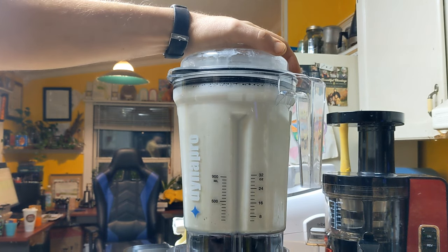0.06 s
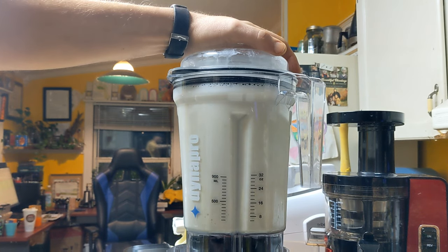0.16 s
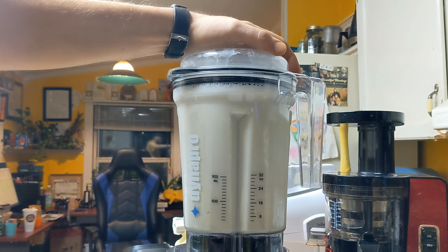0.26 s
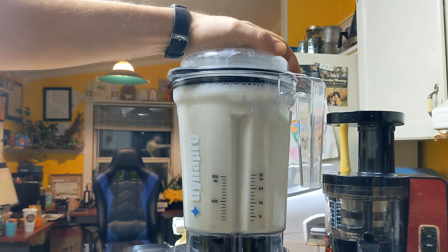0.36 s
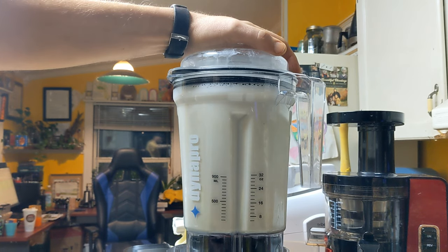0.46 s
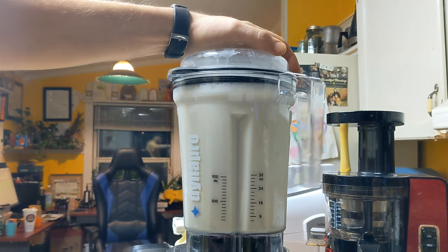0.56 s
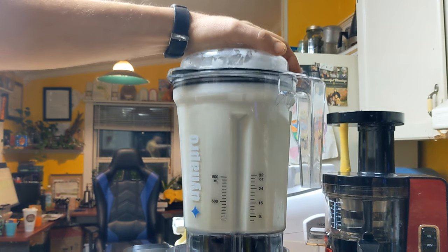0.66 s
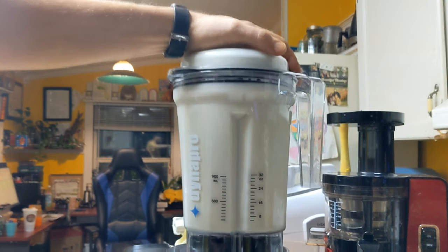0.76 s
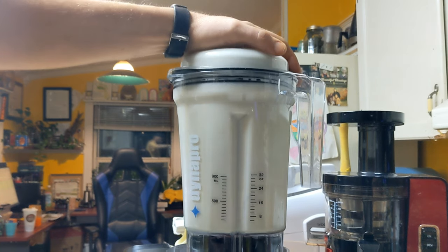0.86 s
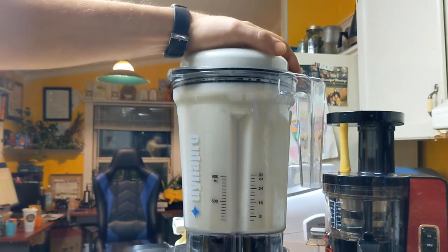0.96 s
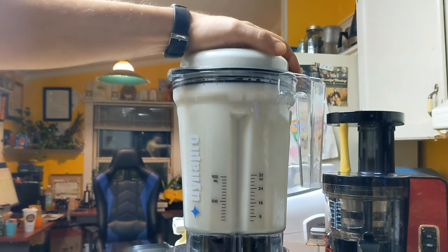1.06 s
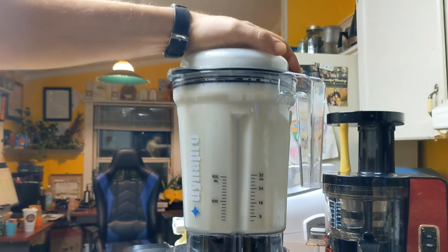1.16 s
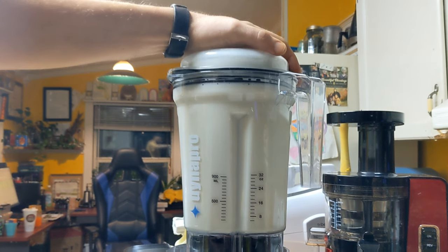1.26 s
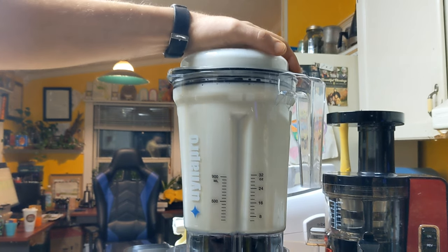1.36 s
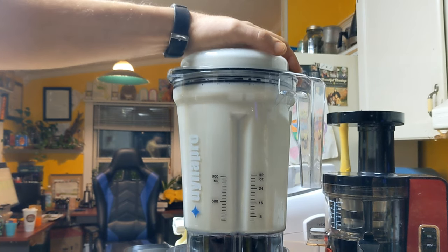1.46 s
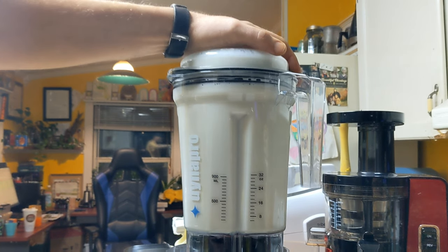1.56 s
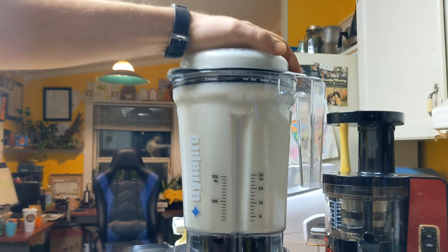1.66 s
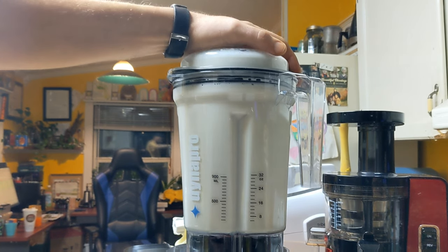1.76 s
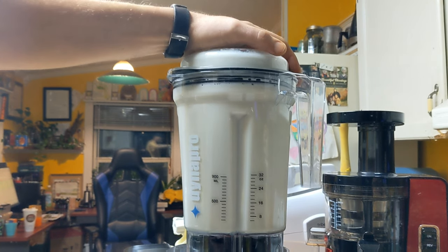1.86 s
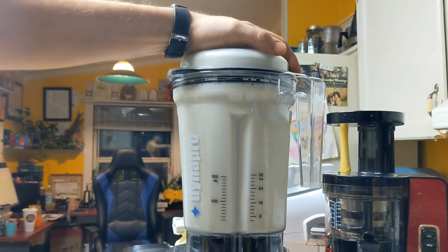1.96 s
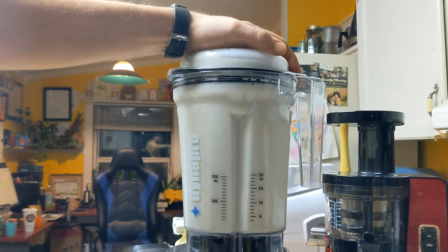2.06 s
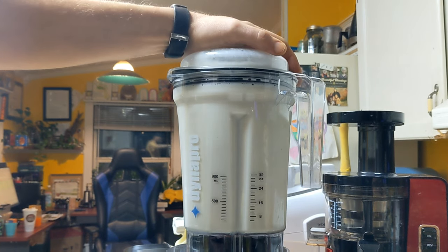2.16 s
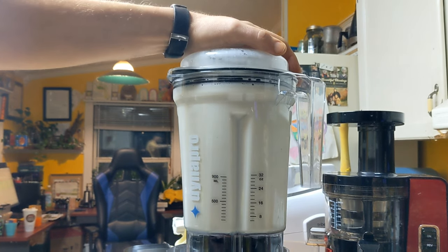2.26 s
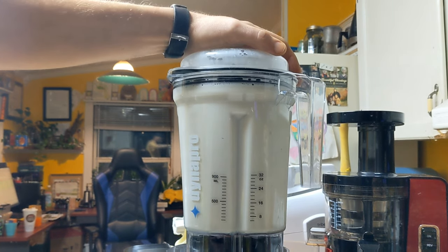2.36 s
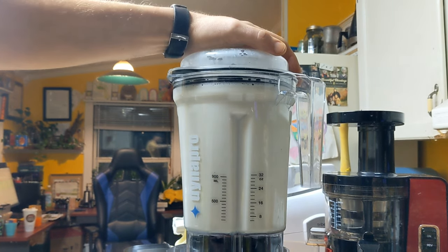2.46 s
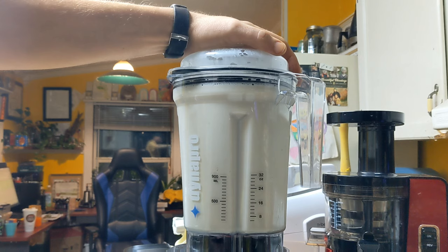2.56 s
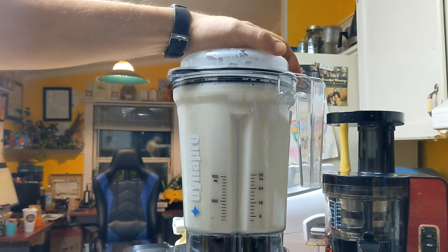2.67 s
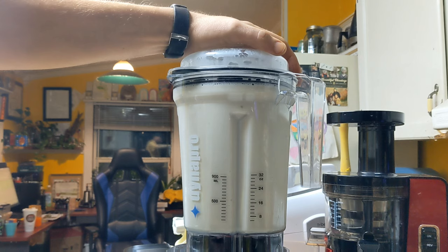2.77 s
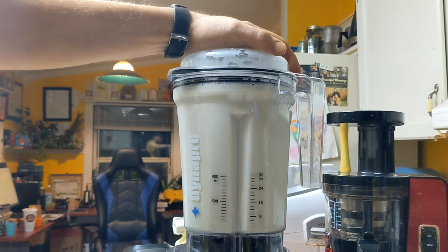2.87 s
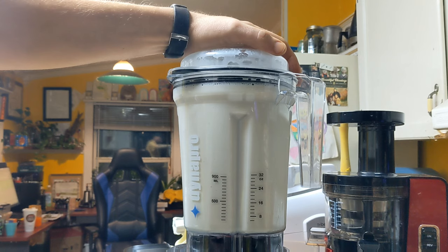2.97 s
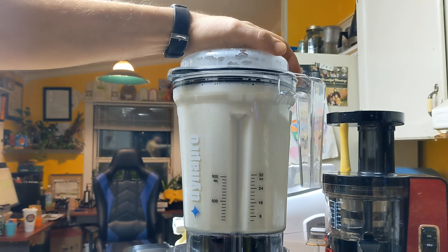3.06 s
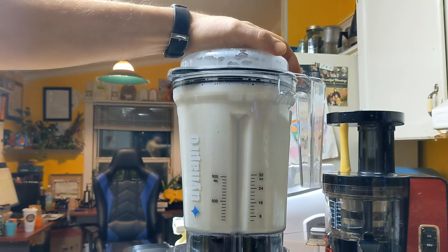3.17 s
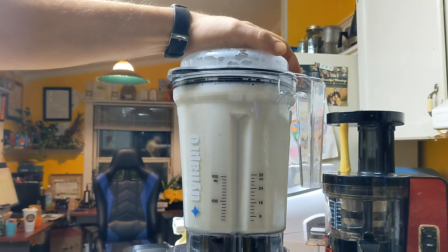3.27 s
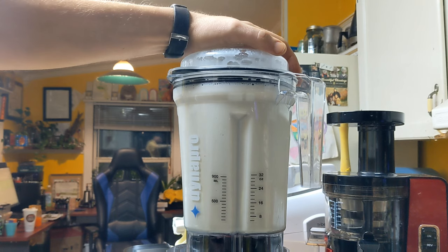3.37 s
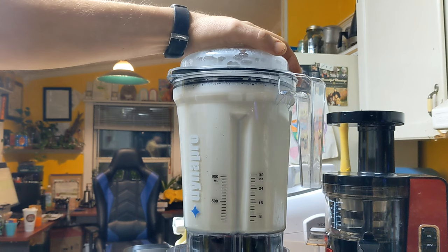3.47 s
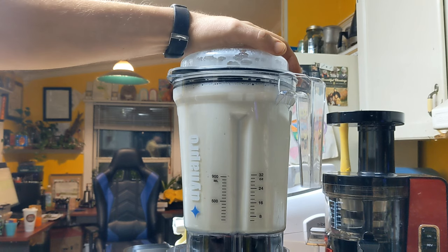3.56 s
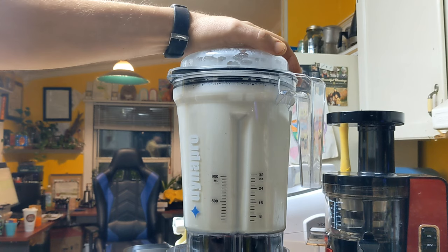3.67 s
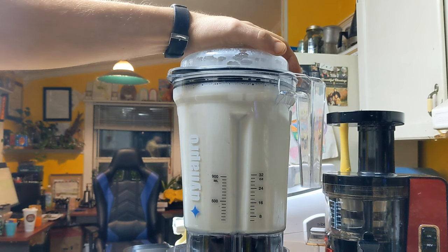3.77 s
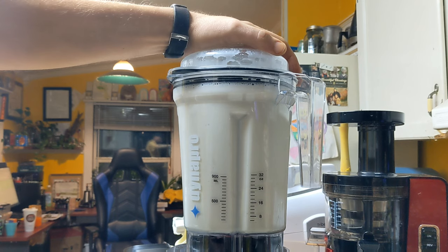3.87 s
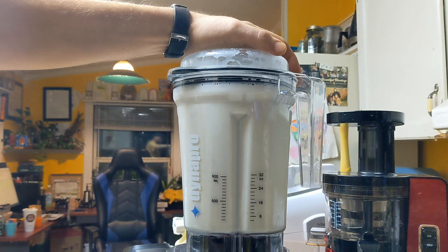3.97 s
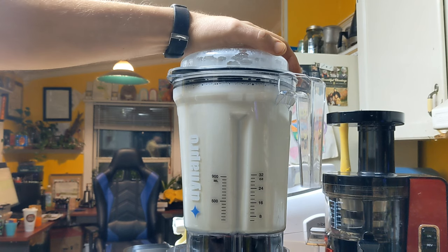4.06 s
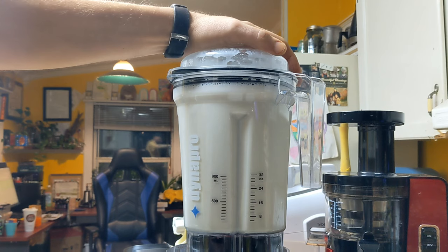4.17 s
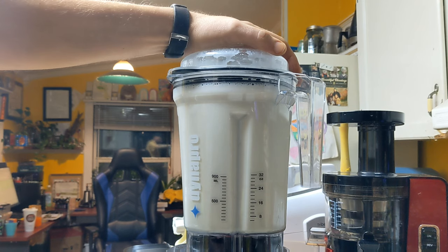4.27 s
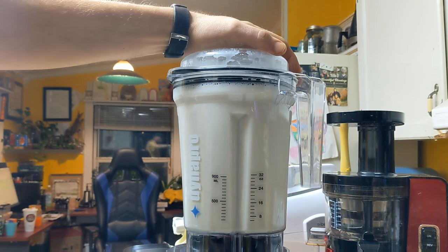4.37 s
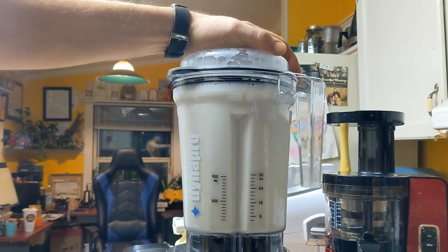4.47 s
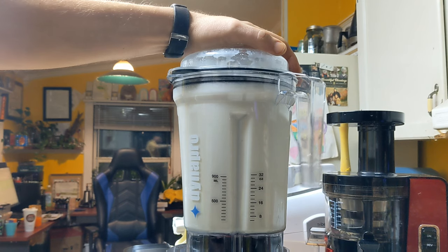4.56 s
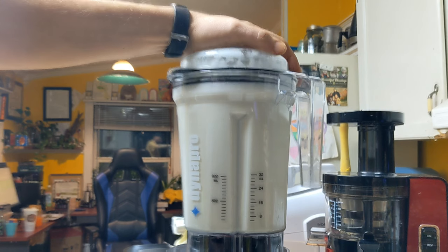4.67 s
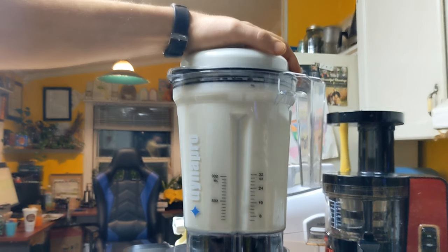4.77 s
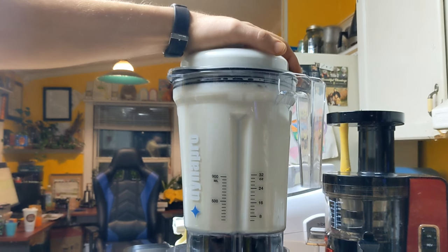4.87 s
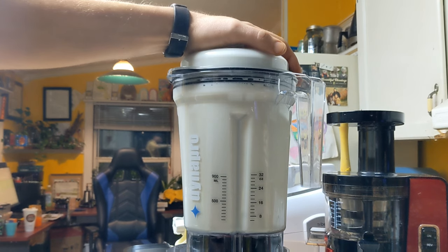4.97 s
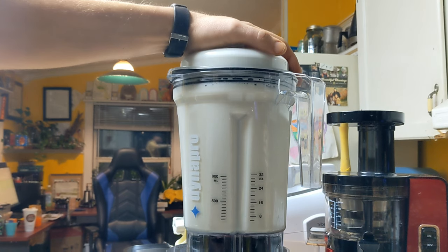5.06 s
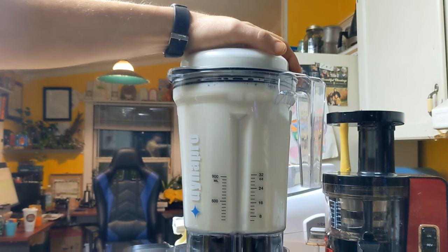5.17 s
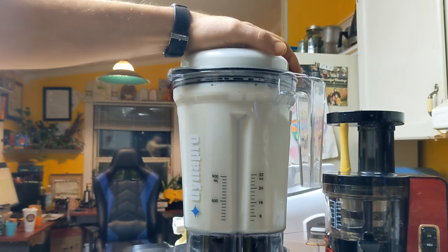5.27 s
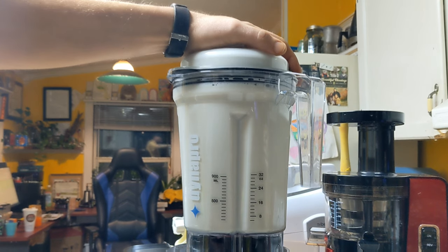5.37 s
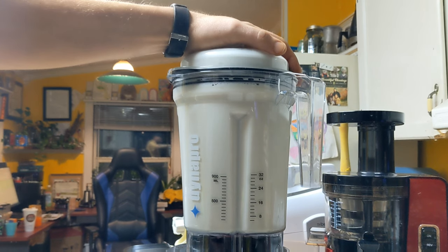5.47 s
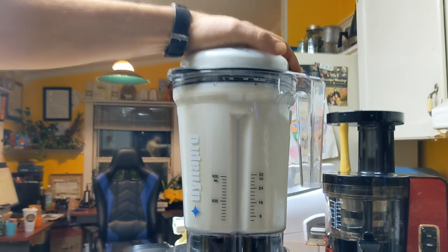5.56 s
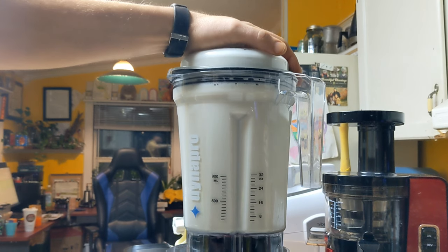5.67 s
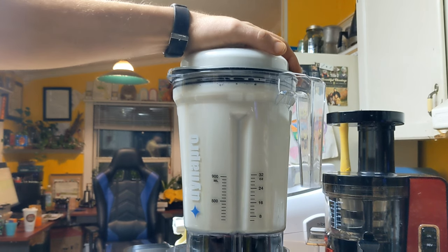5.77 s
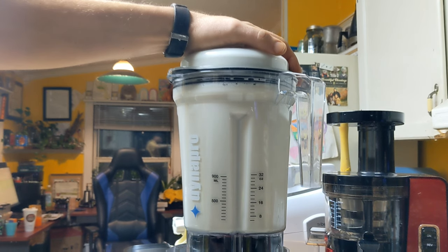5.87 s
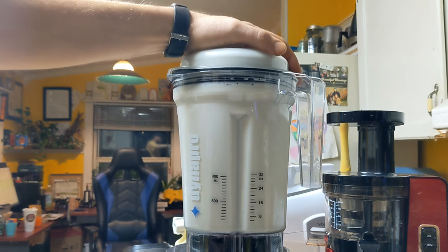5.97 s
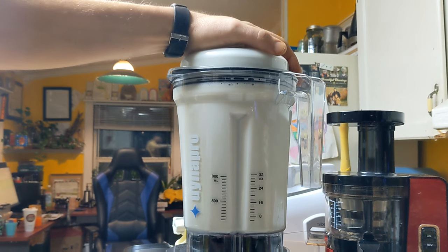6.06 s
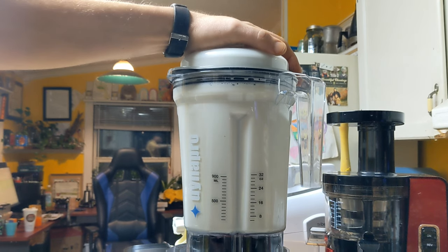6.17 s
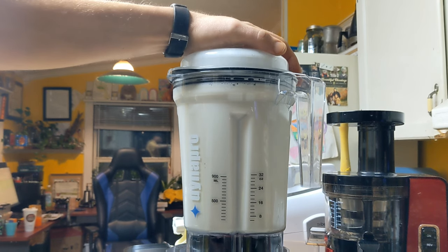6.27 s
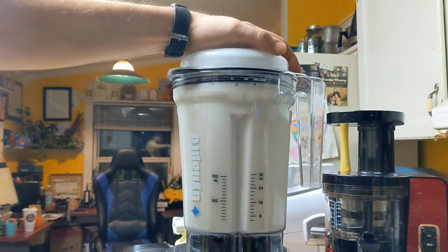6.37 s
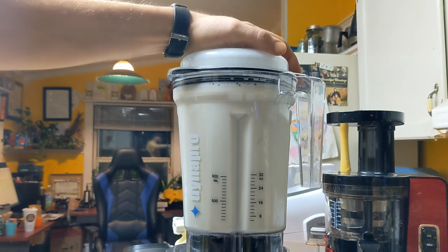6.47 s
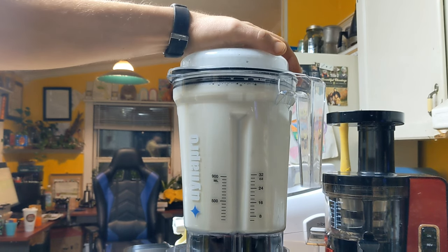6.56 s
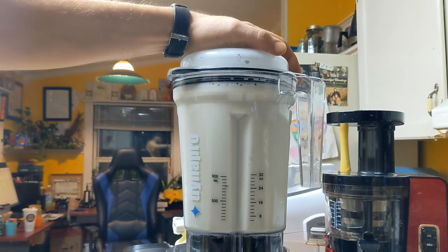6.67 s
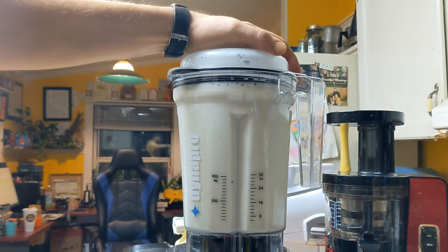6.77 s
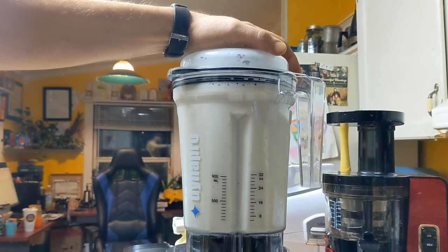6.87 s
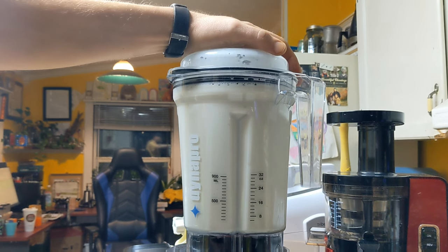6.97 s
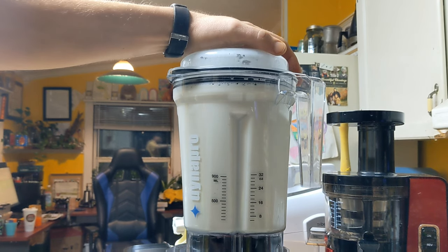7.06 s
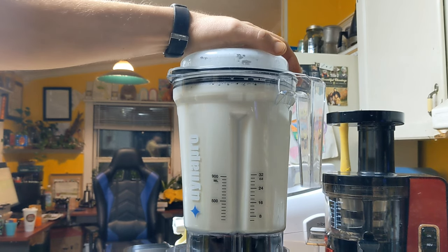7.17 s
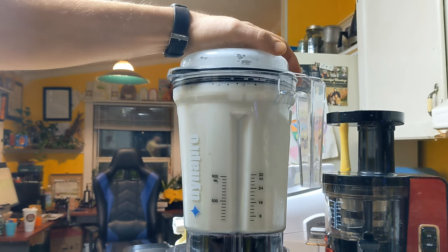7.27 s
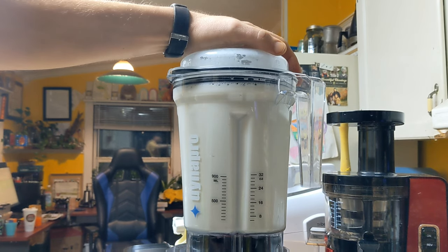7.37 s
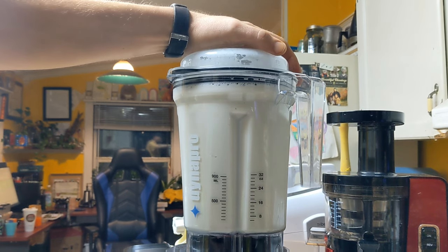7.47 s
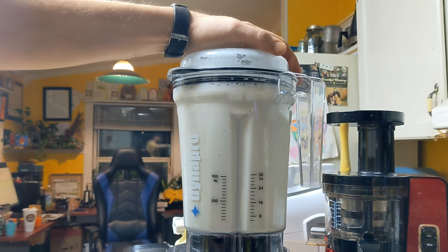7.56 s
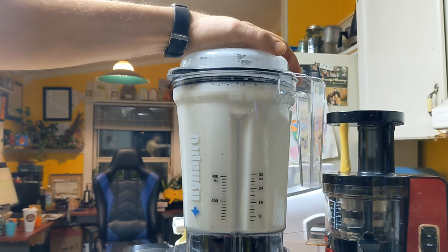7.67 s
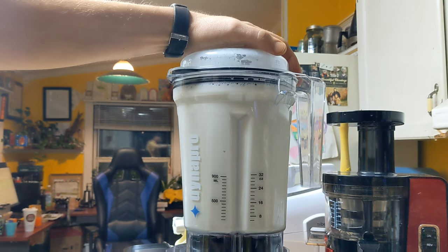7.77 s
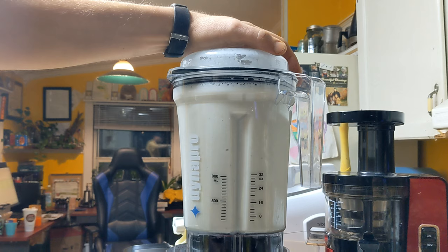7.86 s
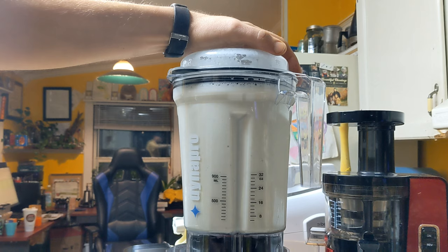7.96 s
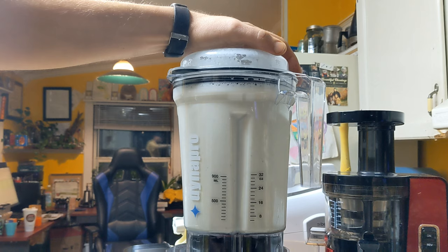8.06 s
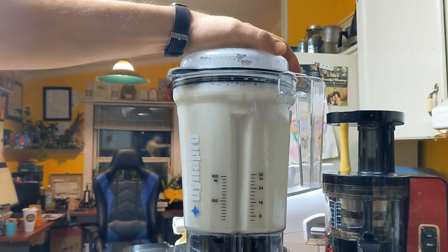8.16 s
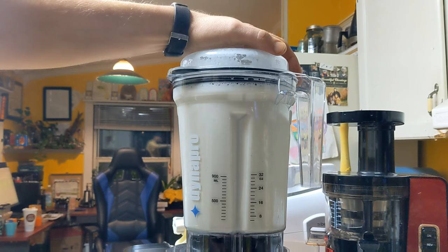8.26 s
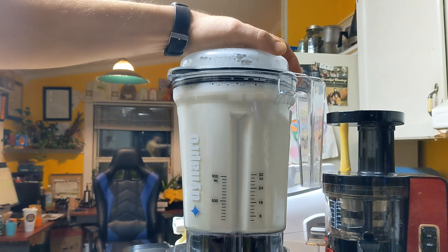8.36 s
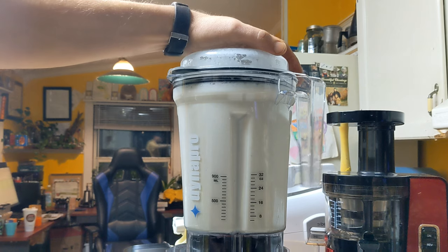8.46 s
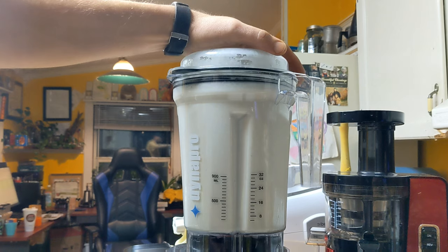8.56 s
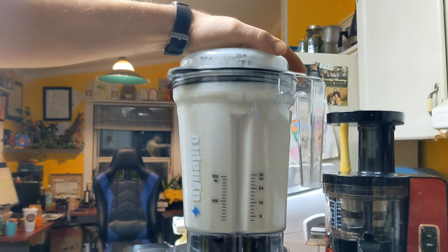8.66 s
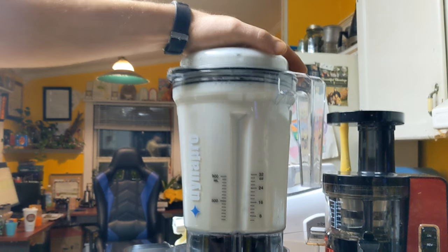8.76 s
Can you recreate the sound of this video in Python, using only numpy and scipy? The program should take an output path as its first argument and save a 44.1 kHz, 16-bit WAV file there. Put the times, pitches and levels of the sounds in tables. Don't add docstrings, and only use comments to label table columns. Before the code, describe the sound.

Three blender pulses: electric buzz and rattle, rising motor whine, wet slap and loud liquid churn, then spin-down into a quiet room.

```python
import sys
import numpy as np
from scipy import signal
from scipy.fft import rfft, irfft, next_fast_len
from scipy.io import wavfile

SR = 44100
rng = np.random.default_rng(int(sys.argv[2]) if len(sys.argv) > 2 else 0)


def attenuation_scalar(level_db):
    decades = np.asarray(level_db, float) / 20
    return 10 ** decades


def unload_audio(sound):
    columns = np.transpose(np.atleast_2d(sound))
    steps = np.round(np.clip(columns, -1, 1) * 32767)
    wavfile.write(sys.argv[1], SR, steps.astype(np.int16))


N = 389403
TIME = np.arange(N) / SR
SIZE = next_fast_len(N)
HZ = np.maximum(np.arange(SIZE // 2 + 1) * SR / SIZE, 1)
BUZZ_HZ = 120.3


def in_time(tables, off=-120):
    rows = []
    for table in tables:
        silent = [off] * (len(table[0]) - 1)
        rows += [(table[0][0] - .012, *silent), *table, (table[-1][0] + .012, *silent)]
    s, *columns = np.transpose(rows)
    return [np.interp(TIME, s, column) for column in columns]


def turns(tables):
    s, hz = np.concatenate(tables)[:, :2].T
    return 2 * np.pi * np.cumsum(np.interp(TIME, s, hz)) / SR


def at_hz(points):
    hz, value = np.array(points).T
    return np.interp(np.log(HZ), np.log(np.maximum(hz, 1)), value)


def drift(rate_hz):
    r = np.exp(-80 * np.pi * rate_hz / SR)
    noise = rng.standard_normal(N // 40 + 2002)
    slow = signal.lfilter([1], [1, -2 * r, r * r], noise)[2000:]
    return np.interp(np.arange(N) / 40, np.arange(len(slow)), slow / slow.std())


def power_sum(a_db, b_db):
    return 10 * np.log10(attenuation_scalar(a_db) ** 2 + attenuation_scalar(b_db) ** 2)


def resonate(x, hz, width_hz):
    r = np.exp(-np.pi * width_hz / SR)
    poles = [1, -2 * r * np.cos(2 * np.pi * hz / SR), r * r]
    return signal.lfilter([(1 - r * r) / 2, 0, (r * r - 1) / 2], poles, x)


def tone(phase, db, shake=.06):
    strength = np.sqrt(2) * attenuation_scalar(db) * (1 + shake * drift(30))
    return strength * np.sin(phase + shake * drift(6.9))


def swept(tables, centre_hz, width_hz, top_db, steep):
    hz = in_time(tables, off=-9e4)[0]
    loss_db = 10 * np.log10(1 + np.abs((hz - centre_hz) / width_hz) ** steep)
    return np.maximum(top_db - loss_db, -120)


# hz, likeness_0_to_1
LIKENESS = [(60, .98), (300, .95), (800, .75), (1100, .4), (1400, .45), (1900, .7), (2600, .45),
            (3150, .75), (3700, .4), (5000, .28), (15000, .22)]
# hz, left_minus_right_db
BALANCE_DB = [(60, -3.5), (130, 0), (290, 3), (640, -2.5), (1410, 1.5), (3100, -0.5), (6820, 3.5),
              (15000, 5)]
# hz, lead_rad
LEAD = [(1, 0), (780, .2), (1030, 1.2), (1400, .8), (2000, .5), (3300, 2), (6300, 3.1), (9800, 4),
        (11000, 2), (15600, 3.2)]


def stereo_noise(db):
    shared, left, right = rfft(rng.standard_normal((3, SIZE)))
    alike = at_hz(LIKENESS)
    lead = [np.exp(1j * at_hz(LEAD)), 0 * HZ + 1]
    pair = np.sqrt(alike) * shared * lead + np.sqrt(1 - alike) * np.array([left, right])
    echo = .2 * HZ ** 2 / (HZ ** 2 + 2000 ** 2)
    for lags_s in rng.uniform(.002, .014, (6, 2, 1)):
        pair *= (1 + echo * np.exp(-2j * np.pi * HZ * lags_s)) / np.sqrt(1 + echo ** 2)
    balance_db = at_hz(BALANCE_DB) * [[.5], [-.5]]
    return pair * attenuation_scalar(db + balance_db) / np.sqrt(np.mean(attenuation_scalar(db) ** 2))


# time_s, speed_turns_per_s, load_unevenness_db
SHAFT = [
    [(.9, 169, -3.5), (.95, 200, -3), (1.0, 212, 1), (1.09, 228, -3.5), (1.2, 217, 0), (1.33, 204.5, 0.2),
     (1.5, 213, 1.2), (1.75, 207.4, -0.9), (2.05, 205, 0.8)],
    [(4.822, 205, -8.5), (4.835, 208, -9)],
    [(4.915, 172, -7.5), (4.998, 229, -4.5), (5.074, 234.4, 2.5), (5.364, 205, 0.1), (5.57, 217.6, -3),
     (5.748, 211, .3), (5.846, 222, -4), (5.942, 218, 0.5), (6.045, 214, 0)],
]
BRAKE_S, BRAKE_HZ_PER_S = .045, 700


def shaft():
    tables = []
    for rows in SHAFT:
        off_s, hz, load_db = rows[-1]
        tables.append(rows + [(off_s + BRAKE_S, hz - BRAKE_S * BRAKE_HZ_PER_S, load_db)])
    s, hz, load_db = np.concatenate(tables).T
    base_db = swept(tables, centre_hz=201.6, width_hz=13, top_db=-12.5, steep=3.6)
    return turns(tables), np.interp(TIME, s, hz), base_db + np.interp(TIME, s, load_db)


# start_s, end_s, first_blade_hz, climb_hz_per_s
RUN_UP = [
    (0.629, .79, 187.5, 380),
    (4.597, 4.801, 211.5, 270),
    (8.562, 8.812, 196.7, 429),
]
TURN_START_DB, TURN_TOP_DB, TURN_RISE_S = -43, -27.5, .11
BLADE_FADE_IN_DB, BLADE_FADE_IN_S = -5.5, .056


def run_up():
    glides, turn_tables, emerge_db = [], [], 0
    for s, end, hz, climb in RUN_UP:
        glides.append([(s, hz), (end, hz + climb * (end - s))])
        turn_tables.append([(s, TURN_START_DB), (s + TURN_RISE_S, TURN_TOP_DB), (end, TURN_TOP_DB)])
        active = (TIME < end) * (TIME > s - .1)
        emerge_db = emerge_db + BLADE_FADE_IN_DB * active * np.clip(1 - (TIME - s) / BLADE_FADE_IN_S, 0, 1)
    turn_db, = in_time(turn_tables)
    blade_db = swept(glides, centre_hz=235.4, width_hz=8, top_db=-10, steep=2.6) + emerge_db
    return turns(glides), blade_db, turn_db


# middle_s, blade_tone_db, once_a_turn_db
SPURT = [
    (.835, -18, -26.5),
    (4.82, -20.5, -37.5),
    (8.815, -18.5, -29),
]


def spurt():
    half_s, middle_hz, climb_hz, edge_db = .035, 396, 60, 14
    tables = []
    for s, blade_db, turn_db in SPURT:
        tables.append([(s + k * half_s, middle_hz + k * climb_hz,
                        blade_db - abs(k) * edge_db, turn_db - abs(k) * edge_db) for k in (-1, 0, 1)])
    return turns(tables), *in_time(tables)[1:]


# switch_on_s, wind_up_pace, housing_buzz_db, take_up_swell_s, swell_db
PULSES = [
    (0.018, 1.033, -31.5, 0.19, -40.5),
    (4.031, 1.02, -34.5, 4.215, -30.5),
    (8.031, 1.08, -38.5, 8.224, -29),
]
# first_db, grow_s, full_db, swell_re_peak_db
BUZZ = [(-56.5, 0.45, -2, -0.1), (-68, 0.21, -46.5, -17), (-74, 0.22, -49, -21.5), (-79, 0.6, -38.5, -28)]


def buzz_levels():
    lasts_s, wobble_db, rise_db_per_s, fall_db_per_s = .6, 2.5, 330, 300
    levels = []
    for group, (first_db, grow_s, full_db, swell_db) in enumerate(BUZZ):
        tables = []
        for on, _, housing_db, *_ in PULSES:
            top_db = full_db + (group == 0) * housing_db
            tables.append([(on, first_db), (on + grow_s, top_db), (on + lasts_s, top_db)])
        db, = in_time(tables)
        db = db + wobble_db * drift(10) * np.clip((db - first_db) / 18, .25, 1)
        for *_, s, peak_db in PULSES:
            away_s = np.maximum(np.abs(TIME - s) - .015, 0)
            slope = np.where(TIME < s, rise_db_per_s, fall_db_per_s)
            db = power_sum(db, peak_db + swell_db - away_s * slope)
        levels.append(db)
    return levels


# harmonic_number, level_db
BUZZ_LINES = [(3, -1), (4, -13.5), (5, -3), (7, -9.5), (8, -10)]


def winding_buzz():
    second_db, sixth_db, others_db, first_db = buzz_levels()
    mains = 2 * np.pi * BUZZ_HZ * TIME
    out = tone(mains, first_db, shake=.2) + tone(2 * mains, second_db)
    out += tone(6 * mains, sixth_db - 3.0, shake=.17)
    for k, db in BUZZ_LINES:
        out += tone(k * mains + k * k, others_db + db, shake=.16)
    return out


def motor():
    phase, _, shaft_db = shaft()
    out = tone(phase, shaft_db) + winding_buzz()
    for phase, blade_db, turn_db in (run_up(), spurt()):
        out += tone(phase, blade_db, shake=.12) + tone(phase / 2, turn_db, shake=.05)
    return out


# time_s, spray_db, t60_s
SLAPS = [
    (.777, -24.5, .6),
    (4.783, -29, .6),
    (8.775, -25.5, .8),
]
# after_switch_on_s, level_db
WIND_UP = [(0, -76.5), (.1, -64), (.27, -54.5), (.36, -43.5), (.6, -30.5), (0.679, -24.5)]
# time_s, level_db
STIR = [
    [(.768, -22.5), (.79, -9.5), (.86, -16.5), (.91, -19), (1.0, -15), (1.06, -16), (1.12, -13.5),
     (1.3, -15.5), (2.02, -15.5)],
    [(4.77, -21.5), (4.81, -14), (4.88, -22), (4.95, -18), (5.12, -13), (5.4, -15.5), (5.7, -15),
     (5.93, -15), (6.07, -17)],
    [(8.744, -17.5), (8.79, -16), (8.83, -10.5)],
]
# after_switch_off_s, re_running_db
COAST = [(.11, -6), (.2, -14.5), (.38, -32.5), (.48, -46.5), (.68, -69.5)]
# at_full_stir_db, share_winding_up, share_coasting, share_above_full
FOLLOW = [(-42.5, 0.77, 0.21, 0.05), (-23.5, 0.76, 0.8, .2), (-22, 1.025, 0.97, 0.97),
          (-31.5, 0.92, 0.81, 0.86)]
FULL_STIR_DB = -22


def stir_levels():
    tables, coasting = [], 0
    for (on, pace, *_), rows in zip(PULSES, STIR):
        off, off_db = rows[-1]
        coast = [(off + s, off_db + drop_db) for s, drop_db in COAST]
        tables.append([(on + s / pace, up_db) for s, up_db in WIND_UP] + rows + coast)
        coasting = coasting + (TIME > off) * (TIME < off + 1)
    excess = in_time(tables, off=-150)[0] - FULL_STIR_DB
    levels = []
    for full_db, up, coast, above in FOLLOW:
        share = np.where(coasting, coast, up)
        levels.append(full_db + share * np.minimum(excess, 0) + above * np.maximum(excess, 0))
    rumble_db, growl_db, roar_db, hiss_db = levels

    _, blade_db, turn_db = run_up()
    slap = 0
    for s, *_ in SLAPS:
        slap = slap + np.clip((TIME - s) / .012, 0, 1) * np.exp(-np.maximum(TIME - s, 0) / .069)
    rumble_db = np.minimum(rumble_db, excess + FULL_STIR_DB + 12) + 10 * slap
    rumble_db = power_sum(rumble_db, turn_db - 10)
    growl_db = power_sum(growl_db, blade_db - 12)
    brighten_db = np.maximum(.14 * (shaft()[1] - 211), np.where(coasting, -3, -6))
    return [rumble_db, growl_db, roar_db, hiss_db + 7.5 * slap + brighten_db]


# low_hz, high_hz
CHURN_BANDS_HZ = [(40, 150), (290, 1000), (1000, 3500), (3500, 15500)]
# hz, db_per_hz
COLOUR = [(18, -74), (30, -45.5), (148, -23.5), (213, -6.5), (315, -12.5), (478, -11.5), (993, -13.5),
          (1510, -16.5), (2540, -21), (3050, -21), (3570, -28.5), (10400, -34), (15400, -38)]
# centre_hz, width_hz, left_db, right_db
BODY = [(70, 25, 3.5, 5), (487, 99, 9.5, 5.5), (657, 68, 6, 7), (880, 22, 1, 9.5), (990, 100, -8, -4.5),
        (1510, 290, 6, 5), (1810, 510, -2.5, -3), (2300, 200, 2.5, 0), (2560, 150, -10, -1),
        (3130, 260, 6, 5), (3880, 160, 1, 6), (4520, 210, 2, 2), (5200, 200, 2, -1.5), (6517, 320, 2, 3),
        (6600, 250, -3, 2.5), (7170, 370, 3, 0), (7630, 200, -6.5, -3), (8536, 540, 1, 5),
        (8900, 270, -4, 3), (9830, 130, 0.5, -2), (10360, 100, 6, 0), (12270, 180, 1.5, 0),
        (12670, 400, -2.5, -3), (13900, 500, 0, 3.5), (15050, 400, 1.5, 5)]


def churn(levels_db):
    db = at_hz(COLOUR)
    for hz, width_hz, left_db, right_db in BODY:
        db = db + np.array([[left_db], [right_db]]) / (1 + (2 * (HZ - hz) / width_hz) ** 2)
    pair = stereo_noise(db)
    power = np.sum(attenuation_scalar(db) ** 2, axis=0) / np.sum(attenuation_scalar(db) ** 2)
    usual_db = [10 * np.log10(power[(HZ > lo) & (HZ < hi)].sum()) for lo, hi in CHURN_BANDS_HZ]
    centres = np.log([np.sqrt(lo * hi) for lo, hi in CHURN_BANDS_HZ])
    out, surge_db = 0, 1.0 * drift(39)
    for band in range(19):
        log_hz = np.log(32) + band * np.log(2) / 2
        shares = [np.interp(log_hz, centres, row) for row in np.eye(4)]
        gain_db = sum(s * (level - u) for s, level, u in zip(shares, levels_db, usual_db) if s)
        gain = attenuation_scalar((gain_db + surge_db + 1.08 * drift(3.8))[::32])
        place = 2 * np.log2(HZ / 32) - band
        window = np.cos(np.pi / 2 * np.clip(place, -1, 1)) ** 2
        part = irfft(pair * window, SIZE)[:, :N]
        out = out + np.interp(np.arange(N) / 32, np.arange(len(gain)), gain) * part
    return out * (1 + .046 * np.cos(2 * np.pi * BUZZ_HZ * TIME))


# multiple_of_shaft, left_re_growl_db, right_re_growl_db, wander_hz
BEATS = [(1.21, -10, -10, 8), (2.22, -7, -10, 10), (3, -14, -11, 8), (3.22, -10, -9, 9), (4, -20, -15, 8),
         (4.21, -14, -8, 9), (5.22, -12, -10, 10), (6.24, -12, -14, 12), (7.35, -11, -11, 20)]
# centre_hz, width_hz
JUG_WALL = [(468, 32), (660, 60), (868, 50)]


def blade_beats(growl_db):
    phase, _, shaft_db = shaft()
    running = np.clip((shaft_db + 38.5) / 21, 0, 1)
    out = np.zeros((2, N))
    for multiple, left_db, right_db, wander_hz in BEATS:
        line = (1.5 + drift(wander_hz)) * np.sin(multiple * phase)
        line += drift(wander_hz) * np.cos(multiple * phase)
        out += attenuation_scalar(np.array([[left_db], [right_db]])) * line
    out = out + .81 * sum(resonate(out, hz, width_hz) for hz, width_hz in JUG_WALL)
    return .74 * out * running * attenuation_scalar(growl_db)


def spray():
    shape = 0
    for s, db, t60 in SLAPS:
        rise = np.clip((TIME - s) / .012, 0, 1)
        shape = shape + rise * attenuation_scalar(db - 60 * np.maximum(TIME - s, 0) / t60)
    return shape * resonate(rng.standard_normal((2, N)), 13500, 5000)


# start_s, length_s, level_db, t60_s
RATTLE = [
    (.11, .05, -57, .6),
    (.168, .05, -42, .25),
    (4.178, .085, -39, .9),
    (8.153, .024, -47, .6),
    (8.178, .049, -37, .5),
    (8.228, .05, -35, .35),
]
# centre_hz, width_hz, level_db
COUPLING = [(880, 140, -1.5), (1530, 350, -1.5), (2300, 190, -6.5), (3130, 220, -12.5)]


def rattle():
    shape = 1e-18
    for s, length, db, t60 in RATTLE:
        uneven = rng.standard_normal(16)
        since = np.clip(TIME - s, 0, length)
        cycle = BUZZ_HZ * since
        burst_db = db + 19 + 1.5 * uneven[cycle.astype(int)] - 32 * (cycle % 1) - 60 * since / t60
        shape = shape + (since > 0) * (since < length) * attenuation_scalar(burst_db)
    bursts = shape * (rng.standard_normal(N) + .91 * rng.standard_normal((2, N)))
    return sum(attenuation_scalar(db) * resonate(resonate(bursts, hz, w), hz, 1.3 * w) for hz, w, db in COUPLING)


# start_s, pitch_hz, level_db, t60_s
RING = [
    (2.24, 203.8, -36.5, 0.66),
    (2.2, 203.5, -33, 3.1),
    (6.27, 211, -31, .4),
    (6.4, 208, -50, 2.3),
]


def jug_ring():
    out = 0
    for s, hz, db, t60 in RING:
        since = np.maximum(TIME - s, 0)
        phase = 2 * np.pi * (hz - 1.6 * since / 2) * since
        out = out + np.minimum(since / .02, 1) * tone(phase, db - 60 * since / t60, shake=.03)
    return out


# start_s, peak_db, pitch_hz, t60_s
KNOCKS = [(.09, -70, 2500, .04), (.127, -50.5, 1500, .07), (2.44, -42, 70, .3), (2.621, -51, 500, 0.13),
          (4.03, -58, 2200, 0.085), (4.079, -63, 5500, 0.074), (4.129, -58, 5500, .07),
          (4.179, -61, 5000, .05), (6.531, -43, 66, .35), (6.52, -42, 290, .25), (8.08, -59.5, 4800, .08),
          (8.087, -45, 720, .1), (4.08, -53, 730, .15), (4.13, -52, 730, .15), (8.036, -54, 717, .12),
          (8.13, -58, 5500, .08), (8.141, -47, 780, .1), (8.179, -59, 6000, .06), (8.203, -56, 9100, 0.07),
          (8.228, -51, 9000, .06), (8.253, -54, 8000, .05)]


def knocks():
    out = np.zeros(N)
    t = np.arange(SR // 2) / SR
    for s, db, hz, t60 in KNOCKS:
        at = round(s * SR)
        edge = resonate(rng.standard_normal(len(t)), hz, hz * .9)
        ring = (hz < 1000) * np.sin(2 * np.pi * hz * t)
        out[at:at + len(t)] += (attenuation_scalar(db - 60 * t / t60) * (ring + edge))[:N - at]
    return out


# height_s, level_db, slope_db_per_s either side
DRAIN = (3.3, -70.5, 30)


def drain():
    height_s, level_db, slope_db_per_s = DRAIN
    noise = rng.standard_normal((2, N))
    bands = 6 * resonate(noise, 2310, 130) + 3 * resonate(noise, 1300, 300) + resonate(noise, 5000, 4000)
    return attenuation_scalar(level_db - slope_db_per_s * np.abs(TIME - height_s)) * bands


# hz, db_per_hz
ROOM = [(15, -63), (25, -35), (64, -14), (82, -11.5), (104, -2), (129, -21.5), (226, -3.5), (388, -17),
        (596, -15), (916, -27.5), (1170, -25), (1570, -32), (2280, -30.5), (2480, -31), (15400, -43)]


def room():
    air = attenuation_scalar(-62 + 1.0 * drift(4)) * irfft(stereo_noise(at_hz(ROOM)), SIZE)[:, :N]
    return air + attenuation_scalar(-83.5) * resonate(rng.standard_normal((2, N)), 14000, 4000)


def scene():
    levels_db = stir_levels()
    near = motor() + jug_ring()
    late = np.interp(TIME - 9e-5, TIME, near)
    liquid = churn(levels_db) + blade_beats(levels_db[1]) + spray()
    return np.array([late, near]) + liquid + rattle() + knocks() + drain() + room()


def low_pass(x):
    return signal.sosfilt(signal.butter(12, 16010, fs=SR, output="sos"), x)


def record(dry):
    top_cut = signal.cheby2(14, 60, 15850, fs=SR, output="sos")
    bass_cut = signal.butter(2, 36, "high", fs=SR, output="sos")
    rounded = 1.505 * np.tanh(dry / 1.469)
    mix = signal.sosfilt(np.vstack([top_cut, bass_cut]), rounded)
    return low_pass(mix)


dry = scene()
out = record(dry)
unload_audio(out)
```